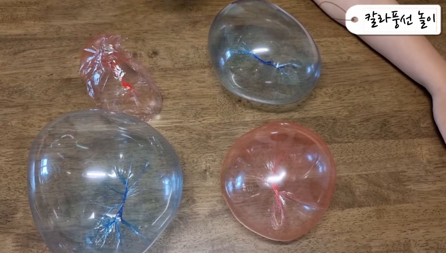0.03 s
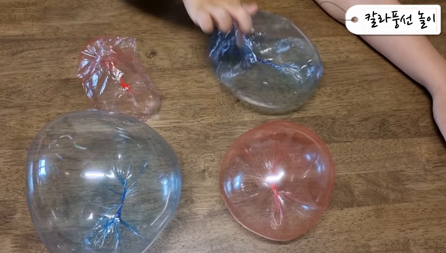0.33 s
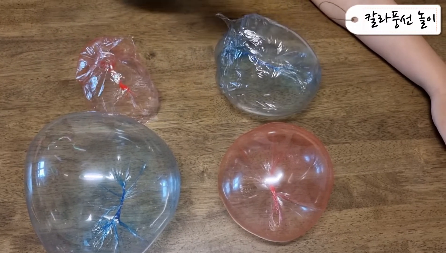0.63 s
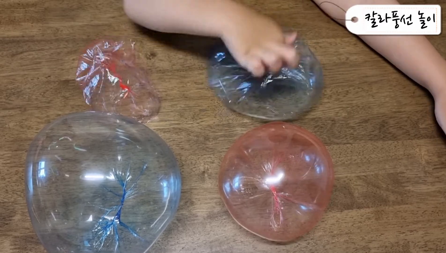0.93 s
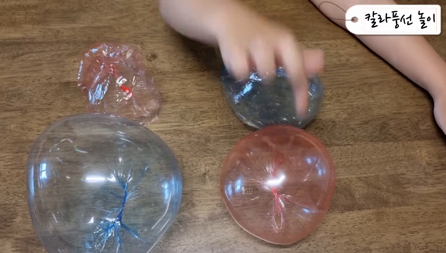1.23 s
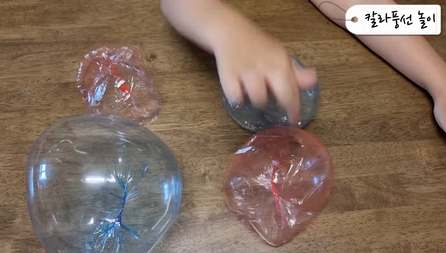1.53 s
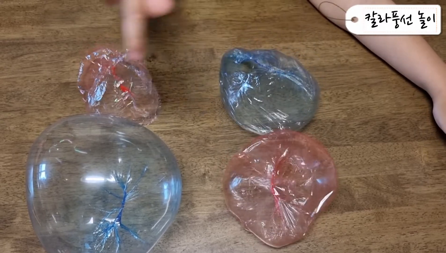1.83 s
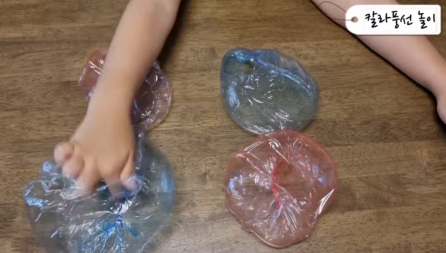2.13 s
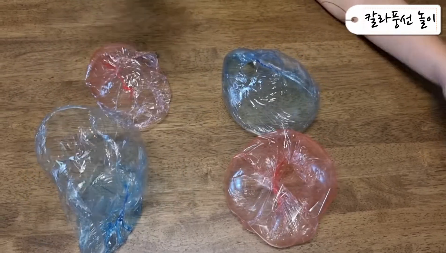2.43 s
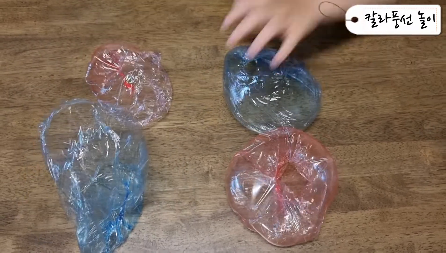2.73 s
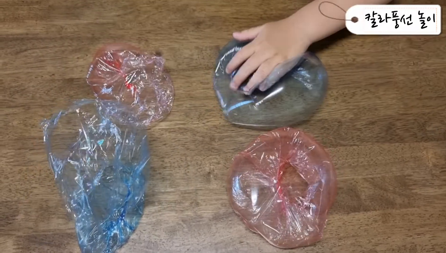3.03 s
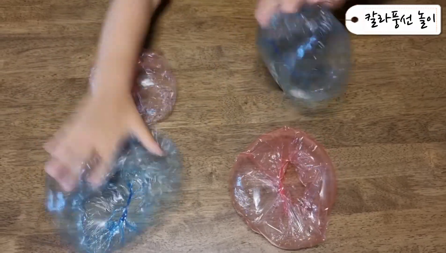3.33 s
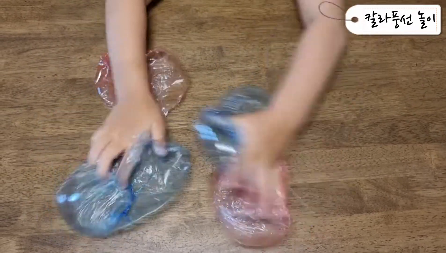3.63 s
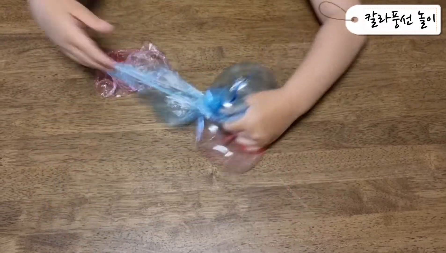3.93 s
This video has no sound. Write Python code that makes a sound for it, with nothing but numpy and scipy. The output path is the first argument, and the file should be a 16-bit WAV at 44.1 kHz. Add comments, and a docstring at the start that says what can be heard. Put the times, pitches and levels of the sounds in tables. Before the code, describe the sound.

A hand slaps thin plastic balloons six times, each crack trailing into a crumple, and two of them burst. The last slap booms on the wooden table, then hands gather the crinkling plastic, close up in a small, lively room.

```python
"""A hand slaps thin plastic balloons on a wooden table, close to a spaced pair of microphones in a
small, lively room. Each slap is a swell of creasing film, a sharp crack, a puff of air and a dying
crumple; two balloons burst, with a longer crumple. One is dragged into the last slap, which drives
through to the table top and makes it boom. Then the hands gather the crinkling plastic."""
import sys
import numpy as np
from scipy import signal
from scipy.fft import rfft, irfft, next_fast_len
from scipy.io import wavfile
from scipy.ndimage import uniform_filter1d

SR = 44100
rng = np.random.default_rng(int(sys.argv[2]) if len(sys.argv) > 2 else 0)


def transcribe(signal):
    """Save signal, clipped to [-1, 1], as a 16-bit WAV file at the path in sys.argv[1]."""
    frames = np.atleast_2d(signal).T
    limited = np.clip(frames, -1, 1)
    pcm = np.round(limited * 32767).astype(np.int16)
    wavfile.write(sys.argv[1], SR, pcm)


N = 176400

# The hand landing, close up. Each row: start in seconds, crack level in dB, crack length in seconds,
# low-mid scoop in dB, palm hollow pitch in Hz, its level in dB, its width as a share of its pitch,
# taut film pitch in Hz, its level in dB, creasing level in dB, crumple level in dB, crumple T60 in
# seconds, treble tilt in dB per octave, bass shelf in dB, left minus right in dB.
SLAPS = [(0.2338, -20, 0.0015, -16, 1066, -21, 0.86, 3825, -24, -36, -36.5, 0.21, -0.3, 6.5, 0.5),
         (0.9346, -20.5, 0.0043, -5.5, 1360, -18, 0.38, 4080, -34.5, -30, -32, 0.13, -1.5, -4, 1.5),
         (1.4439, -13, 0.0029, 2.5, 767, -16, 0.29, 1520, -14, -19, -18.5, 0.42, 0.3, 1, -0.5),
         (2.0891, -12, 0.0029, -9, 2633, -15.5, 0.26, 3880, -17, -25.5, -22, 0.42, 1.7, 2.5, 0),
         (2.8666, -15, 0.0028, 4, 806, -15.5, 0.22, 1150, -10.5, -27.5, -28.5, 0.18, 0.6, -2, 1),
         (3.4382, -13.5, 0.0035, 11, 730, -19.5, .3, 1384, -16.5, -10.5, -49, 0.049, -0.1, 2.5, 0.5)]
# The tone of the crack and of the crumple. Each row: frequency in Hz, relative level in dB.
CRACK_SPECTRUM = [(100, -8.5), (320, -2), (500, -12), (850, 1), (1500, 0), (2100, -2), (2700, 1),
                  (3300, -9), (4000, -0.5), (4600, -11.5), (5400, -14), (8000, -14), (10500, -15),
                  (13000, -13), (16000, -16.5)]
CRUMPLE_SPECTRUM = [(100, -15), (300, -4.5), (800, 0), (1300, 1), (2600, 7), (4100, 0), (5300, -5.5),
                    (7500, -11.5), (10500, -11), (13000, -13.5), (16000, -13.5)]
def slaps():
    """The film creases as the palm lands, cracks, then crumples as its folds give way."""
    out, t = np.zeros((2, N)), np.arange(SR // 2) / SR
    lead = t[:SR // 10]
    crease_rise_s = 0.0067
    for start, crack_db, crack_s, scoop_db, *rest in SLAPS:
        crease_db, crumple_db, t60, tilt_db, bass_db, pan_db = rest[-6:]
        crack = colour(rip(crack_s, apart=1.0), CRACK_SPECTRUM, tilt_db, bass_db, scoop_db)
        add(out, start, undb(crack_db) * crack * pan(pan_db))
        swell = np.exp((lead - lead[-1]) / crease_rise_s)
        crease = crackle(len(lead), per_s=14000, spread_db=2, apart=0.86) * swell
        crease = colour(crease, RUSTLE_SPECTRUM, tilt_db=-0.16, bass_db=bass_db)
        add(out, start - lead[-1], undb(crease_db) * crease * pan(pan_db))
        folds = crackle(len(t), per_s=2400, spread_db=3.5, apart=0.8) * clumps(len(t), spread_db=3)
        crumple = colour(unit(folds) * decay(t, t60), CRUMPLE_SPECTRUM, tilt_db, bass_db, scoop_db)
        add(out, start, undb(crumple_db) * crumple * pan(pan_db - 1))
    return out


def palm_and_film_rings():
    """The air under the palm and the taut film ring for a few cycles at each slap."""
    out, t = np.zeros((2, N)), np.arange(SR // 10) / SR
    film_ring_s = 0.00048
    for start, _, crack_s, _, hollow_hz, hollow_db, width, film_hz, film_db, *_, pan_db in SLAPS:
        band_hz = [hollow_hz / (1 + width / 2), hollow_hz * (1 + width / 2)]
        hollow = signal.lfilter(*signal.butter(2, band_hz, "band", fs=SR), signal.unit_impulse(len(t)))
        film = np.sin(2 * np.pi * film_hz * t) * t * np.exp(-t / film_ring_s)
        ring = undb(hollow_db) * unit(hollow) + undb(film_db) * unit(film)
        add(out, start, ring * np.sqrt(crack_s * 10) * pan(pan_db))
    return out


# Air pushed out by the palm. Each row: start in seconds, pitch in Hz, level in dB, rise and decay
# time in cycles.
PUFFS = [(0.232, 307, -21.5, 0.92), (.2335, 158, -27.5, 0.62), (0.937, 334, -27, 1.28),
         (0.9383, 83.7, -23.5, 0.49), (1.4432, 324, -17, .6), (1.444, 120, -26.5, 0.78),
         (2.0885, 275.3, -13, 0.27), (2.865, 125, -33.5, .9), (3.4402, 365, -8.5, 0.52),
         (3.443, 144, -10.5, 0.39)]
def air_puffs(rumble_cut_hz=59):
    """Squeezed air gives one or two low swings of pressure."""
    out, t = np.zeros((2, N)), np.arange(SR // 10) / SR
    for start, hz, db, cycles in PUFFS:
        age = t * hz / cycles
        add(out, start, -undb(db) * np.sin(2 * np.pi * hz * t) * age * np.exp(1 - age))
    return signal.lfilter(*signal.butter(2, rumble_cut_hz, "high", fs=SR), out)


# The clear modes of the wooden top. Each row: frequency in Hz, level in dB, T60 in seconds.
TABLE_MODES = [(87.7, -4, 0.54), (120, -8, 0.17), (157.7, -11.5, 0.34), (215.7, -5.5, 0.36), (365, 2, 0.23),
               (403.4, -0.5, 0.13), (459, -7, 0.11), (513, -7, 0.16), (606, -6, 0.11), (691, -10.5, 0.4),
               (741, -11, 0.64), (785, -12, 0.43)]
# The thud of the many close modes between them. Each row: frequency in Hz, relative level in dB.
THUD_SPECTRUM = [(70, -16.5), (130, -1.5), (280, -6.5), (450, 0), (740, -0.5), (1000, -15.5), (2000, -36.5),
                 (6000, -59)]
# Knocks on the table. Each row: start in seconds, level in dB, low-pass corner in Hz.
KNOCKS = [(0.046, -50.5, 202), (0.234, -42, 400), (0.482, -67, 500), (0.937, -44, 300), (2.091, -33, 300),
          (2.163, -23, 115), (3.4413, -12, 1110), (3.57, -46, 395), (3.774, -34.5, 137.4)]
def table_knocks(thud_db=-4):
    """The table top thuds and rings; soft knocks reach only its lowest modes."""
    out, t = np.zeros((2, N)), np.arange(SR * 3 // 4) / SR
    for start, db, soft_hz in KNOCKS:
        ring = 0
        for k, (hz, mode_db, t60) in enumerate(TABLE_MODES):
            drive = (-1) ** k * undb(mode_db) / (1 + (hz / soft_hz) ** 2)
            ring += drive * np.sin(2 * np.pi * hz * t) * decay(t, t60)
        thud = colour(diffuse(len(t)) * decay(t, t60=0.28), THUD_SPECTRUM)
        thud = signal.lfilter(*signal.butter(2, soft_hz, fs=SR), thud)
        add(out, start, undb(db) * (ring + undb(thud_db) * thud))
    return out


# The tone of rustling film, close up. Each row: frequency in Hz, relative level in dB.
RUSTLE_SPECTRUM = [(100, -5.5), (300, -4), (800, 2.5), (1500, 4.5), (2500, 2), (4000, -1), (5500, -9),
                   (8500, -7.5), (10500, -7), (13000, -3), (16000, -4)]
# Film rubbing under the hands, just left of centre. Each row: time in seconds, level in dB.
RUSTLE_LEVEL = [(.27, -90), (.43, -60), (.52, -68.5), (.58, -99), (1.0, -88), (1.1, -49.5), (1.125, -100),
                (2.2, -92.5), (2.28, -45), (2.31, -86), (2.6, -74.5), (2.68, -105), (3.4, -70.5),
                (3.55, -54), (3.578, -33.5), (3.62, -41.5), (3.672, -45.5), (3.715, -36), (3.766, -30),
                (3.79, -52.5), (3.83, -37.5), (3.875, -36.5), (3.92, -33), (3.951, -34.5), (4.0, -39)]
# Single creases snapping. Each row: start in seconds, level in dB, length in seconds, treble tilt in
# dB per octave.
CREASE_SNAPS = [(0.484, -48.5, 0.0036, -6.5), (0.907, -49.5, 0.0093, -3.5), (0.943, -36, 0.0036, -5),
                (1.094, -56.5, 0.015, -8), (1.407, -42.5, 0.01, -1.5), (1.422, -34.5, 0.021, -1.5),
                (1.46, -21, 0.0014, -3.5), (2.1024, -21.5, 0.00092, 0), (2.123, -34, 0.0018, -6),
                (3.572, -33, 0.019, -11.5), (3.681, -28, 0.0067, -3.5), (3.728, -34.5, 0.0038, 3),
                (3.756, -32, 0.021, 0.7), (3.862, -25.5, 0.0019, 0.2), (3.948, -34, 0.0065, 2)]
def crinkling():
    """Slack film rustles in small clumps under the hands, and now and then a crease snaps."""
    times, levels_db = np.array(RUSTLE_LEVEL).T
    level = undb(np.interp(np.arange(N) / SR, times, levels_db))
    grains = unit(crackle(N, per_s=5000, spread_db=4, apart=0.9) * clumps(N, spread_db=2))
    out = colour(grains * level, RUSTLE_SPECTRUM)
    for start, db, length_s, tilt_db in CREASE_SNAPS:
        add(out, start, undb(db) * colour(rip(length_s, apart=0.76), RUSTLE_SPECTRUM, tilt_db))
    return out * pan(db=1.3)


def sliding(end_s=3.471, end_db=-47.5, rise_s=0.2):
    """Film dragged over the wood hisses, fine-grained and bright, swelling into the last slap."""
    remaining_s = end_s - np.arange(N) / SR
    level = undb(end_db) * np.exp(-(remaining_s / rise_s) ** 4) * (remaining_s > 0)
    grains = crackle(N, per_s=14000, spread_db=2.5, apart=0.52)
    return colour(grains * level, RUSTLE_SPECTRUM, tilt_db=3.5)


def rip(length_s, apart):
    """A short rip of film with an even spectrum; `apart` sets how unlike the two microphones hear it."""
    t = np.arange(SR // 10) / SR
    fade = np.exp(-(t / length_s) ** 2)
    noise = rng.standard_normal(len(t)) + apart * rng.standard_normal((2, len(t)))
    spectrum = rfft(noise * fade)
    flat = irfft(spectrum / np.abs(spectrum))
    return unit(flat * np.sqrt(fade)) * np.sqrt(length_s * 10)  # as strong as rms 1 over its length


def crackle(n, per_s, spread_db, apart):
    """Tiny buckling clicks of uneven size; each throws a different share to the two microphones."""
    hits = rng.random(n) < per_s / SR
    sizes = undb(spread_db * np.clip(rng.standard_normal(n), -2, 2))
    clicks = hits * sizes * rng.choice([-1, 1], n)
    return unit(clicks * (1 + apart * rng.standard_normal((2, n))))


def clumps(n, spread_db, per_s=130):
    """A gain that jumps about as folds give way one after another."""
    jumps = np.clip(rng.standard_normal(n // 50), -1.5, 1)
    return undb(spread_db * np.interp(np.arange(n) / SR * per_s, np.arange(len(jumps)), jumps))


# The small room around the table. Each row: frequency in Hz, T60 in seconds.
ROOM_T60 = [(100, 0.88), (350, 0.29), (1000, 0.37), (3000, 0.43), (7000, 0.44), (14000, 0.31)]
# The tone of its tail. Each row: frequency in Hz, gain in dB.
ROOM_SPECTRUM = [(60, -18.5), (200, 1), (500, 3.5), (2000, -2.5), (5000, -2.5), (14000, -2.5)]
def room(x, tail_db=-1.5, early_db=-4, early_s=0.0089, onset_s=0.004):
    """The walls return a cluster of early reflections, then a smooth tail that lingers in the bass."""
    n = SR * 3 // 4
    t, f = np.arange(n) / SR, np.fft.rfftfreq(n, 1 / SR)
    noise, tail = diffuse(n), 0
    tone = undb(at(ROOM_SPECTRUM, f))
    fade_out = np.clip((t[-1] - t) * 5 - 1, 0, 1)
    for hz, t60 in ROOM_T60:
        band = at([(centre, centre == hz) for centre, _ in ROOM_T60], f)
        rate = np.log(1000) / t60
        dying = even(noise * decay(t, t60), bins=90) * np.sqrt(2 * rate / SR)
        tail += irfft(rfft(dying) * band * tone, n) * fade_out
    early = unit(even(diffuse(n) * np.exp(-t / early_s), bins=60) * (t < 0.1)) / np.sqrt(n)
    response = (undb(tail_db) * tail + undb(early_db) * early) * np.minimum(t / onset_s, 1)
    return np.array([signal.fftconvolve(a, b)[:N] for a, b in zip(x, response)])


# Room tone, from all around the microphones. Each row: frequency in Hz, relative level in dB.
ROOM_TONE_SPECTRUM = [(15, -51), (25, -14), (90, -11), (124, -11), (293, -22), (345, -16), (826, -17),
                      (1650, -20), (2270, -24.5), (4980, -43), (6500, -58.5), (11700, -88)]
def room_tone(air_db=-59.5, hum_db=-62, hum_hz=119.2):
    """Quiet room air with a faint mains hum."""
    air = unit(spectral(diffuse(N), lambda f: undb(at(ROOM_TONE_SPECTRUM, f))))
    return undb(air_db) * air + undb(hum_db) * np.sin(2 * np.pi * hum_hz * np.arange(N) / SR)


def diffuse(n, mic_spacing_m=0.25):
    """Noise from all sides: alike at the two microphones in the bass only."""
    likeness = np.sinc(2 * np.fft.rfftfreq(n, 1 / SR) * mic_spacing_m / 343)
    mid, side = rfft(rng.standard_normal((2, n))) * np.sqrt([1 + likeness, 1 - likeness])
    return unit(irfft(np.array([mid + side, mid - side]), n))


def colour(x, points, tilt_db=0, bass_db=0, scoop_db=0, size=2048):
    """Causal filter through (Hz, dB) points, with tone controls; keeps the power of white noise."""
    f = np.fft.rfftfreq(size, 1 / SR)
    tilt = tilt_db * np.log2(f / 1000 + 1)
    shelf = bass_db / (1 + (f / 550) ** 4)
    scoop = scoop_db * np.exp(-(np.log2((f + 1) / 540) / 0.4) ** 2)  # between low thump and crack
    cepstrum = irfft(np.log(undb(at(points, f) + tilt + shelf + scoop)))
    cepstrum[1:size // 2] *= 2  # fold to minimum phase
    cepstrum[size // 2 + 1:] = 0
    response = irfft(np.exp(rfft(cepstrum)))
    return signal.fftconvolve(x, response[None] / np.linalg.norm(response))[:, :x.shape[1]]


def even(x, bins):
    """Level out the broad chance peaks and dips in the spectrum of a noise; keeps its power."""
    power = uniform_filter1d(np.abs(rfft(x)) ** 2, bins, axis=-1)
    return unit(irfft(rfft(x) / np.sqrt(power), x.shape[1])) * x.std()


def spectral(x, gain):
    """Apply a gain given as a function of frequency."""
    n = next_fast_len(x.shape[1] + SR // 10)
    return irfft(rfft(x, n) * gain(np.fft.rfftfreq(n, 1 / SR)), n)[:, :x.shape[1]]


def at(points, f):
    """Read (Hz, value) points on a log-frequency axis."""
    hz, values = np.array(points, float).T
    return np.interp(np.log(f + 1), np.log(hz), values)


def add(out, start, x):
    """Mix a sound in at a time in seconds."""
    i = max(int(start * SR), 0)
    out[:, i:i + x.shape[-1]] += x[..., :max(N - i, 0)]


def decay(t, t60):
    """Fall by 60 dB every t60 seconds."""
    return 1000 ** (-t / t60)


def pan(db):
    """Left and right gains for a level difference."""
    return undb(np.array([[1], [-1]]) * db / 2)


def undb(db):
    """Decibels to gain."""
    return 10 ** (np.asarray(db) / 20)


def unit(x):
    """Scale to rms 1."""
    return x / np.sqrt(np.mean(x ** 2))


# The balance across the spaced pair. Each row: frequency in Hz, left minus right in dB.
MIC_BALANCE = [(100, 1.5), (350, -2), (1200, -1), (2600, -4.5), (4200, -7), (6000, 2.5), (8000, 2.5),
               (10500, 4), (13000, -13), (16000, 10)]
def scene():
    """Balloons and table reach the left microphone first; the room answers, mostly to the plastic."""
    plastic = slaps() + crinkling() + sliding()
    rings, air, wood = palm_and_film_rings(), air_puffs(), table_knocks()
    mic_lag_s = np.array([[0], [0.0002628]])
    direct = spectral(plastic + rings + air + wood, lambda f: np.exp(-2j * np.pi * f * mic_lag_s))
    reverb = room(plastic + 0.35 * rings + 0.3 * air + 0.07 * wood)
    return spectral(direct + reverb, lambda f: pan(at(MIC_BALANCE, f))) + room_tone()


def record(dry):
    """The recorder rounds only the highest peaks and cuts the top above 15.4 kHz."""
    rounded = dry / (1 + dry ** 4) ** 0.25
    return signal.sosfilt(signal.ellip(10, 0.2, 80, 15400, fs=SR, output="sos"), rounded)


dry = scene()
out = record(dry)
transcribe(out)
```